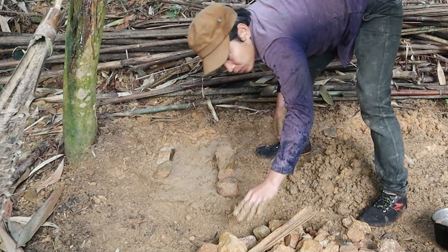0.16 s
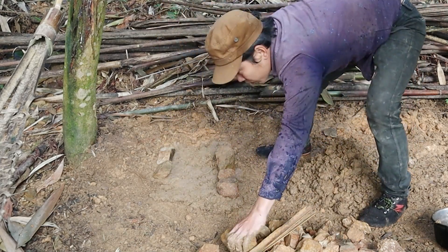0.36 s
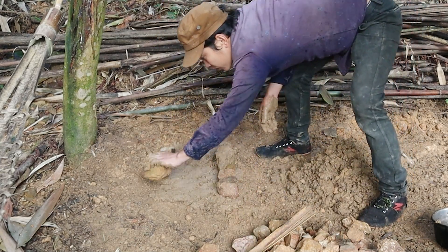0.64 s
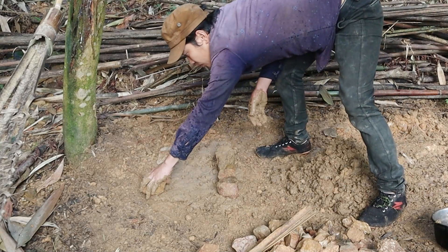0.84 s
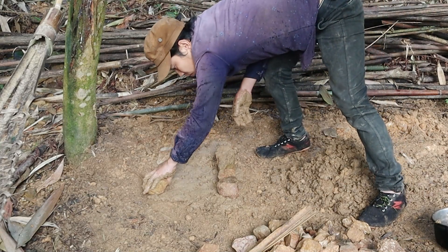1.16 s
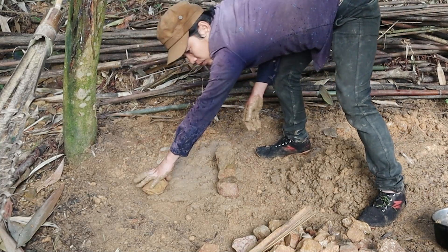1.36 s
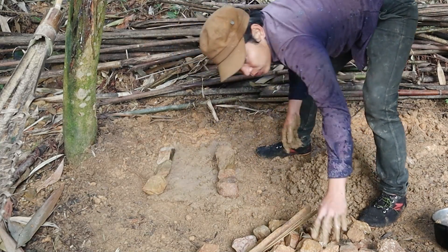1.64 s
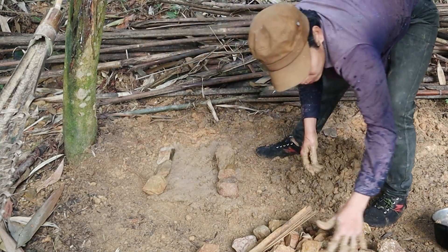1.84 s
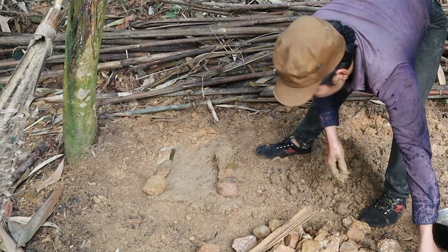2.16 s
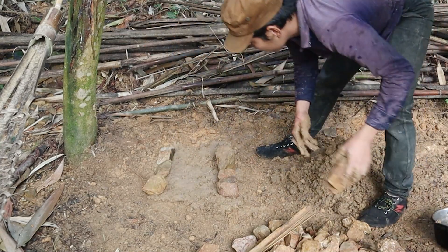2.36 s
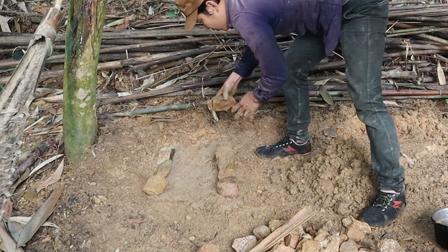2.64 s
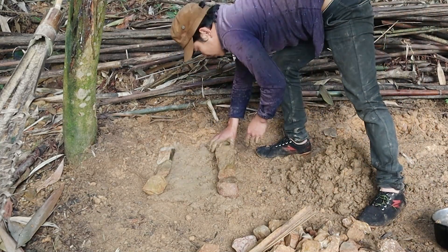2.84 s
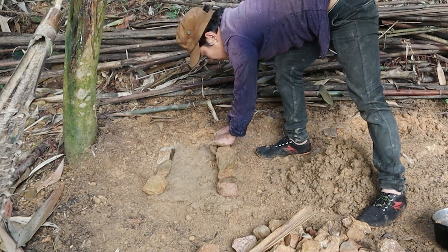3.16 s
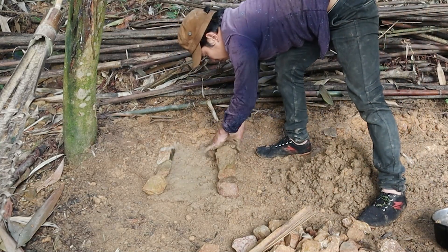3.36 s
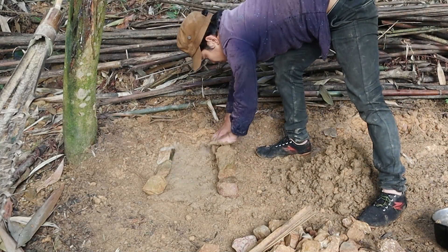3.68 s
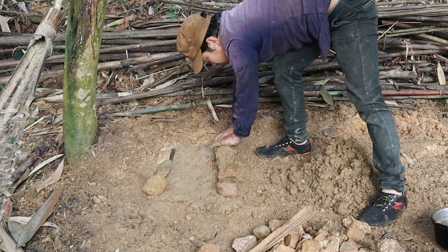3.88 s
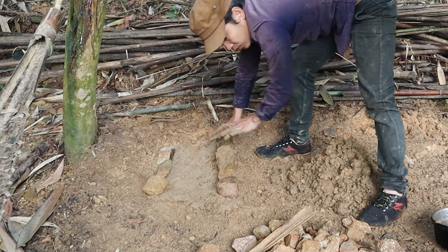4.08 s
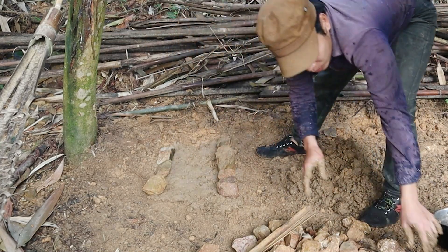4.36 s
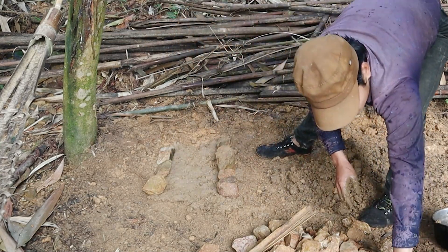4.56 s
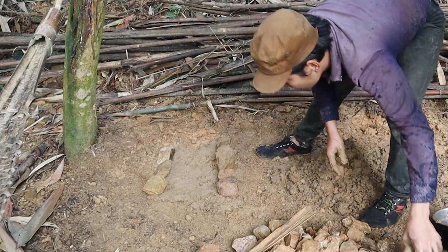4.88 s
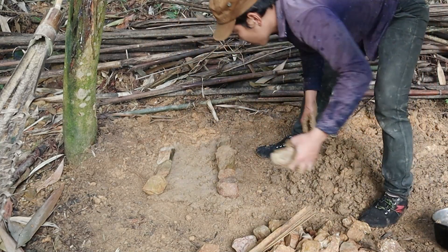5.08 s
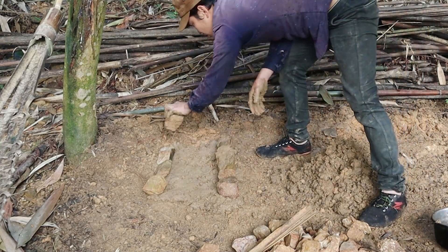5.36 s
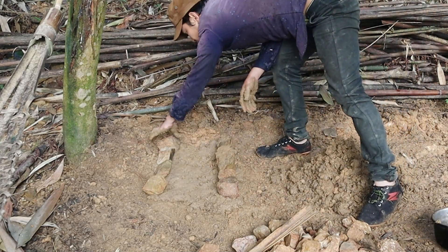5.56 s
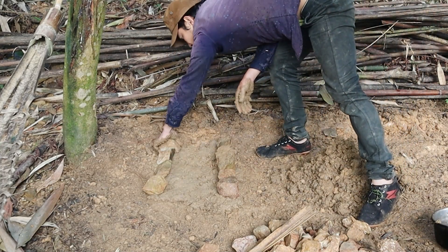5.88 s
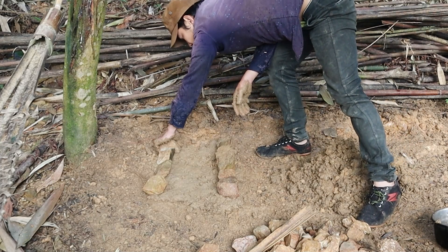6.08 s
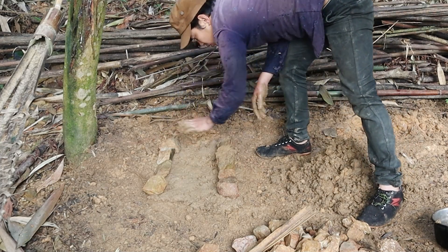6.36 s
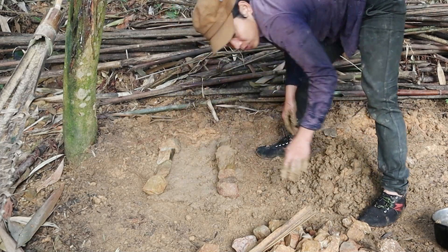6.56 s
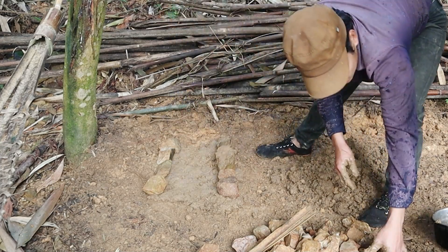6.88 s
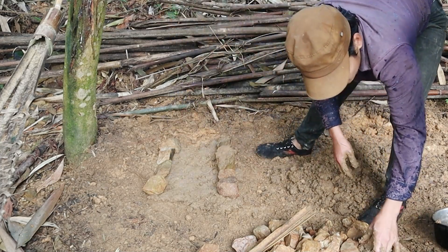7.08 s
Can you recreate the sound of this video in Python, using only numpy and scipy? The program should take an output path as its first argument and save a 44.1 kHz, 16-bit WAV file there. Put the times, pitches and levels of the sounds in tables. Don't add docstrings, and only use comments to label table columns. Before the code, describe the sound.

Stones clack and are pressed into loose, gritty soil, with dull thumps and crumbling earth, under a steady high insect drone in the woods.

```python
import sys
import numpy as np
from scipy import signal
from scipy.fft import rfft, irfft, next_fast_len
from scipy.io import wavfile

SR = 44100
rng = np.random.default_rng(int(sys.argv[2]) if len(sys.argv) > 2 else 0)


def decibels_to_gain(level_db):
    exponent = np.asarray(level_db, float) / 20
    return 10 ** exponent


def master(y):
    cut = np.clip(np.atleast_2d(y).T, -1, 1)
    pcm = np.round(cut * 32767)
    wavfile.write(sys.argv[1], SR, pcm.astype(np.int16))


N = 318402


def rms_one(x):
    return x / np.sqrt(np.mean(x ** 2) + 1e-20)


def highpass(x, hz):
    return signal.sosfilt(signal.butter(2, hz, "high", fs=SR, output="sos"), x)


def band(x, low_hz, high_hz, order=2):
    return signal.sosfilt(signal.butter(order, [low_hz, high_hz], "band", fs=SR, output="sos"), x)


def resonate(x, hz, width_hz):
    r = np.exp(-np.pi * width_hz / SR)
    feedback = [1, -2 * r * np.cos(2 * np.pi * hz / SR), r * r]
    return signal.lfilter([(1 - r * r) / 2, 0, (r * r - 1) / 2], feedback, x)


def coloured(spectrum):
    size = next_fast_len(N)
    hz, db = np.transpose(spectrum)
    bin_hz = np.arange(size // 2 + 1) * SR / size
    gain = decibels_to_gain(np.interp(np.log(bin_hz + 1), np.log(hz), db, left=-90, right=-90))
    return rms_one(irfft(rfft(rng.standard_normal(size)) * gain, size)[:N])


def drift(rate_hz):
    knots = rng.standard_normal(int(N / SR * 60) + 2)
    return np.interp(np.arange(N) / SR * rate_hz, np.arange(len(knots)), knots)


def grains(per_s, spread_db):
    sizes = decibels_to_gain(spread_db * np.minimum(rng.exponential(1, N), 5)) * rng.choice([-1, 1], N)
    return rms_one(sizes * (rng.random(N) < per_s / SR))


def add(out, s, sound):
    at = round(s * SR)
    out[at:at + len(sound)] += sound[:N - at]


def dying(t60, rise_s, size=4096):
    t = np.arange(size) / SR
    shape = (1 - np.exp(-t / rise_s)) * decibels_to_gain(-60 * t / t60)
    return shape / shape.max()


def pressing(contact_s, size=4096):
    t = np.arange(size) / SR
    return t, (t / contact_s) ** 2 * np.exp(2 - 2 * t / contact_s)


def crush(noise, hz, wide_db):
    wide = rms_one(band(noise, 560, 10000, order=1))
    stone = rms_one(resonate(resonate(noise, hz, 0.4 * hz), hz, 0.4 * hz))
    return rms_one(decibels_to_gain(wide_db) * wide + stone)


def bursts(rows, rise, roundness):
    power, t = np.zeros((3, N)), np.arange(N) / SR
    for s, db, coarse_db, dust_db, dies in rows:
        near = slice(round((s - dies * rise) * SR), round((s + dies) * SR))
        late = (t[near] - s) / dies
        fall_db = -60 * np.where(late > 0, late, -late / rise) ** roundness
        size_db = np.array([[coarse_db], [0], [dust_db]])
        power[:, near] += decibels_to_gain(db + fall_db + size_db) ** 2
    return power


def woods():
    # time in seconds, broad chorus, near singer and forest hiss in dB.
    insect_levels = [
        (0, -41, -41, -49.5),
        (.6, -40.5, -42.5, -50),
        (.8, -39.5, -47, -50),
        (1.1, -41, -52, -50.5),
        (1.4, -41, -43.5, -50),
        (3.0, -40.5, -41.5, -50.5),
        (4.4, -40.5, -43, -51),
        (5.4, -41, -43.5, -50),
        (6.2, -40.5, -41, -50),
        (7.22, -41.5, -43, -50),
    ]
    # frequency in Hz, density in dB per Hz.
    chorus_shape = [(9800, -57), (10400, -14.5), (10900, -4), (11400, 1), (11900, -3.5), (12500, 0),
                    (12800, -7), (13300, -24)]
    # frequency in Hz, density in dB per Hz.
    forest_shape = [(29, -48), (50, -7.5), (108, -3.5), (144, -3), (273, -1), (517, -4), (786, -5),
                    (859, -3), (1020, -6.5), (2640, -8.5), (3020, -8), (6380, -18.5), (9700, -41),
                    (12600, -32), (21300, -120)]
    # time in seconds, pitch in Hz.
    hum_pitch = [
        (0, 901),
        (3.5, 865),
        (7.22, 852),
    ]
    singer_hz, singer_width_hz, throb_hz = 12315, 70, 39.0

    s, *levels = np.transpose(insect_levels)
    t = np.arange(N) / SR
    chorus_db, singer_db, hiss_db = [np.interp(t, s, level) for level in levels]
    chorus = coloured(chorus_shape) * decibels_to_gain(chorus_db + 2.5 + 0.71 * drift(30))

    beat = 2 * np.pi * np.cumsum(throb_hz + .3 * drift(2.5)) / SR
    throb_db = 3.3 * np.cos(beat) + 2.6 * np.cos(3 * beat)
    singer = resonate(rng.standard_normal(N), singer_hz, singer_width_hz * 2.4)
    singer = rms_one(resonate(singer, singer_hz, singer_width_hz * 3.6)) * decibels_to_gain(singer_db + throb_db)

    top_hiss = decibels_to_gain(-54.5 + 2.5) * rms_one(band(rng.standard_normal(N), 10500, 19845, order=4))
    hum_hz = np.interp(t, *np.transpose(hum_pitch)) + 4.1 * drift(16)
    hum = decibels_to_gain(-65.5 + 1.0 * drift(4.3)) * np.sin(2 * np.pi * np.cumsum(hum_hz) / SR)
    hiss = decibels_to_gain(hiss_db - 2.0 + 0.29 * drift(27.0)) * coloured(forest_shape)
    return chorus + singer + top_hiss + hum + hiss


def soil():
    # peak in seconds, level in dB, coarse grains and dust in dB re level,
    # dying time in seconds. Soil crumbles under a set-down stone:
    crumbles = [(.7515, -38, 1, -6, 0.052), (.7595, -33, 7, -9, 0.069), (.764, -24, -7, -10, 0.041),
                (.778, -34, -1, 1, 0.2), (.803, -32, -8, -3, 0.098), (.812, -46, -6, 0, .2),
                (2.897, -45, 0, 0, 0.14), (2.9135, -29, 1.5, 1, 0.19), (2.945, -48, 0, -4, 0.23),
                (3.34, -42, 7, -13, 0.12), (3.36, -52, 10, -10, 0.36), (3.7205, -48, 12, -5, 0.045),
                (3.7272, -19, 2, -8, 0.037), (3.74, -37.5, -5, -2, 0.25), (5.5165, -30, -3, -8, .015),
                (5.525, -28.5, 2.5, 2, 0.18), (5.55, -39, 0, -12, 0.2), (5.929, -48, 4, -10, .03),
                (5.9405, -35, 2, 7, .08), (5.955, -37, -2.5, -8, 0.21)]
    slides = [(.348, -56, 8, 14, 0.033), (.368, -45, -5, 4, .05), (.388, -49, 5, -3, 0.077),
              (.49, -63, 13, -1, 0.11), (1.82, -52, 0, 6, 0.046), (1.88, -53.5, 7.5, -4, 0.08),
              (2.207, -35, -25, 2, 0.05), (2.225, -35, -16, 4.5, 0.074), (2.245, -36, -16, 0, .07),
              (2.26, -42, -20, -2, 0.09), (4.665, -45, -4, 0, 0.07), (4.687, -33, -10, 2, 0.037),
              (4.70, -34, -16, 5, 0.055), (4.725, -38, -2, 0, 0.15), (4.771, -36, -15, 6, .02),
              (4.784, -40, -2.5, 2, 0.069), (4.835, -48.5, -2, 5, 0.19), (7.012, -47, -2, 1, 0.12),
              (7.048, -46, 6, -5, 0.11), (7.072, -43, 7, 8, 0.057), (7.1, -45.5, 5.5, -2, 0.11),
              (7.135, -40, 1.5, 3, 0.021), (7.157, -45, 2, 0, 0.13)]
    brushes = [(.978, -47, -9, 2, .1), (1.06, -45.5, -5, 2, 0.091), (1.1, -49.5, -11, -3, .15),
               (2.08, -57, 0, 15, .08), (2.612, -55, 2, 15, .05), (3.17, -52, -10, 10, .07),
               (3.193, -37.5, -25, -5, 0.12), (3.236, -44, -11, -1, .09), (3.51, -50, -14, 6, .12),
               (3.545, -44.5, -13, 7, 0.077), (3.925, -45, -8, 3, 0.17), (4.05, -60, -10, 17, .05),
               (4.29, -56, 3, -11, 0.099), (4.91, -52, -5, -1, 0.14), (5.78, -53, -19, 8, .1),
               (6.105, -49, 0, -9, 0.11), (1.24, -54, -5, -5, .1), (1.435, -60, 9, -5, .08),
               (6.7, -56, 2, -8, .1)]
    # levels of coarse, fine and dust grains in dB.
    trickle_levels = (-64, -57, -55)
    crumb_share, clump_db = .6, 1.0
    bounce_s, bounce_share = .00023, .3
    dip_hz, dip_width_hz, dip_share = 7430, 3200, 0.12

    crumbs = crumb_share * grains(1200, 3.)
    # clicks, low Hz, high Hz, lift dB
    sizes = [(grains(5000, 2.5), 700, 3800, .1),
             (grains(9000, 2.5), 4600, 9900, .8),
             (grains(12000, 2.), 11500, 16200, 2.5)]
    sliding = bursts(slides, rise=1, roundness=1.32)
    power = bursts(crumbles, rise=0.54, roundness=0.65) + sliding + bursts(brushes, rise=0.95, roundness=0.91)

    out, clumps = np.zeros(N), drift(55)
    for (clicks, low, high, lift_db), moving, trickle_db in zip(sizes, power, trickle_levels):
        stirred = rms_one(band(clicks + crumbs, low, high, order=3)) * np.sqrt(moving)
        trickle = rms_one(band(clicks[::-1], low, high, order=3)) * decibels_to_gain(trickle_db)
        out += decibels_to_gain(lift_db + clump_db * clumps) * (stirred + trickle)

    share = bounce_share * sliding[1] / (power[1] + decibels_to_gain(trickle_levels[1]) ** 2)
    samples = np.arange(N)
    out = out + share * np.interp(samples - bounce_s * SR, samples, out)
    return out - dip_share * resonate(out, dip_hz, dip_width_hz)


def cricket():
    # start in seconds, peak in dB, pitch in Hz, length in seconds.
    chirps = [(.05, -50, 2350, .02), (.2349, -44.5, 3040, .025), (.609, -50, 3100, .023),
              (1.51, -51, 2850, .022), (2.365, -51, 2880, .02), (2.41, -53, 2900, .018),
              (2.83, -52, 2800, .02), (3.3535, -35, 2950, .017), (4.28, -52, 2400, .025),
              (4.455, -51, 3100, .02), (4.47, -51, 1850, .025), (4.51, -49, 3000, .023),
              (6.03, -51, 2950, .015), (6.3, -52, 4500, .015), (6.56, -51, 3100, .02),
              (6.691, -50, 3050, .021)]
    out = np.zeros(N)
    for s, db, hz, length in chirps:
        t = np.arange(round(length * SR)) / SR
        swell = np.sin(np.pi * t / length) ** 0.42
        pulses = 0.83 + 0.45 * np.cos(2 * np.pi * 130 * t)
        blur = np.cumsum(rng.normal(0, .07, len(t)))
        add(out, s, decibels_to_gain(db) * swell * pulses * np.sin(2 * np.pi * hz * t + blur))
    return out


def ticks():
    # start in seconds, peak in dB,
    # grit colour in Hz.
    pebble_ticks = [(0.349, -30, 5300), (0.349, -31, 2200), (0.3653, -27, 1310), (0.474, -24, 2200),
                    (0.5, -31, 1300), (1.8514, -35, 4870), (1.8724, -29, 2840), (1.895, -25.5, 2750),
                    (2.2083, -19.5, 7800), (2.2695, -24, 5400), (4.6544, -33, 4500), (4.668, -25, 8700),
                    (4.678, -20, 8700), (4.6856, -15.5, 3900), (4.704, -20, 8700), (4.711, -20, 8600),
                    (6.9983, -34, 2200), (7.015, -32, 3500), (7.0274, -21, 4000), (7.0498, -28, 2900),
                    (7.0566, -26, 2100), (7.0897, -27, 2000), (7.0957, -27, 3060), (7.1235, -29, 2070),
                    (7.1346, -22, 5600), (7.147, -28, 5000), (7.15, -27, 3800), (7.1563, -28, 3600),
                    (4.68, -26, 2600), (4.7, -19, 3500), (4.731, -30, 2000), (4.7738, -23, 4900),
                    (4.876, -35, 5500), (0.375, -31, 1500), (0.374, -30, 6200), (2.2245, -23, 5300),
                    (2.2422, -23, 9500), (2.2534, -24, 5000), (1.1876, -36, 3500), (1.245, -36, 5500),
                    (1.666, -35, 9000), (4.7077, -23, 3500), (4.719, -24, 4500), (4.821, -33.5, 2620),
                    (4.834, -30, 5220), (4.9075, -22.5, 4540), (4.9317, -31, 4570), (4.993, -37.5, 5970),
                    (7.006, -22, 3350), (7.12, -22, 3350), (7.1315, -27, 1400), (7.136, -28, 1300),
                    (7.1536, -31, 1160),
                    (0.7716, -33, 2500), (0.7981, -21, 9500), (0.802, -21, 7000), (0.9807, -33.5, 5400),
                 (1.0725, -33, 6060), (3.1654, -28, 5200), (3.173, -25, 5270), (3.24, -32.5, 3070),
                 (3.317, -24.5, 3260), (3.318, -22, 6640), (3.7122, -21, 5400), (3.7165, -22, 1300),
                 (3.7195, -19, 900), (3.4994, -33.5, 5660), (3.541, -28.5, 9490), (3.906, -35, 8710),
                 (3.931, -30, 5130), (4.276, -34, 2370), (4.47, -38, 1870), (5.7705, -29, 4960),
                 (5.891, -32.5, 2980), (5.9298, -24, 1700), (5.934, -21.5, 1800), (6.0951, -31, 1210),
                 (6.097, -35, 3000), (6.11, -36, 5200), (6.24, -40, 4000), (6.3625, -35, 7000),
                 (6.363, -33, 14800), (3.1866, -27, 5200), (1.056, -37, 2500), (1.097, -37, 5500)]
    out = np.zeros(N)
    for s, db, hz in pebble_ticks:
        grit = crush(rng.standard_normal(4096), hz, wide_db=-7.)
        add(out, s, decibels_to_gain(db - 7) * grit * dying(t60=0.015, rise_s=0.0002))
    return out


def knocks():
    # start in seconds, peak in dB, stone ring in Hz, contact time in seconds,
    # crushed grit in dB re peak. A stone is set down against its neighbours, edge after edge:
    set_downs = [(0.7535, -8, 1500, 0.0004, -8), (0.7538, -14, 3200, 0.0003, -4),
                 (0.7547, 1.5, 1180, 0.0006, -35), (0.7548, -11, 3700, 0.0005, -6),
                 (.7811, -17, 2190, 0.00015, -17), (2.9017, -10, 3100, 0.00025, -8),
                 (2.9052, -6, 5300, 0.0004, -12), (2.9069, -12.5, 3900, 0.00031, 2),
                 (2.9074, -3.5, 1550, 0.0004, -8), (2.9102, -13, 1300, 0.0006, -8),
                 (2.9053, -14, 3600, 0.0004, -10), (2.908, -3.5, 2900, 0.00046, -25),
                 (2.9076, -10, 750, 0.0008, -6), (3.1911, -12, 5700, 0.00027, -20),
                 (3.3357, -7.5, 1150, 0.0005, -18), (3.3363, -11, 2800, 0.0005, -30),
                 (3.3369, -15, 950, 0.0009, -20), (3.7121, -5.5, 920, 0.0008, -26),
                 (3.71198, -10, 1680, 0.0009, -31), (3.7258, -22, 3600, 0.0004, -3),
                 (3.725, -20, 1070, 0.0004, 0.5), (0.7548, -15.5, 5000, 0.00025, -2),
                 (2.9033, -14, 6300, 0.00018, -6), (2.9085, -13, 7400, 0.0005, -8),
                 (3.3356, -23, 5700, 0.00047, -5), (5.9307, -18.5, 5500, 0.00027, -1.5),
                 (5.9341, -16, 5300, 0.00059, -2), (5.9343, -15, 2980, 0.0008, -8),
                 (5.9339, -15, 537, 0.00048, -4)]
    pile_clacks = [(4.6855, -6.5, 8900, 0.0003, -15), (4.6912, -12, 8500, 0.0004, -8),
                   (4.6925, -20, 3970, 0.00035, 1), (4.6938, -19, 9000, 0.0004, -3),
                   (4.6969, -15, 9300, 0.00036, -7), (4.6936, -16, 14200, 0.0004, -6),
                   (4.697, -11, 13800, 0.0004, -10), (4.765, -18, 13800, 0.0005, -3),
                   (4.7697, -19, 13300, 0.0005, -3), (4.7697, -22, 8900, 0.0004, -6),
                   (4.7649, -17, 1700, 0.0003, -6), (4.7695, -21, 1900, 0.00035, -4),
                   (7.0305, -11, 2150, 0.0003, -20), (7.0342, -21, 1750, 0.0003, -12),
                   (7.0619, -16, 3270, 0.0003, -9), (7.0659, -16, 3300, 0.0003, -9),
                   (7.0678, -18, 1900, 0.0005, -6), (7.0635, -20, 1900, 0.0005, -4),
                   (7.0785, -20, 2000, 0.0005, -4), (7.0704, -20, 3300, 0.0004, -3),
                   (7.0735, -22, 3450, 0.0004, -3), (7.0776, -18, 3400, 0.0003, -6),
                   (7.0527, -25, 1850, 0.0003, -4)]
    drop_cracks = [
        (5.5171, -4, 2100, 0.00027, -9),
        (5.5177, -3, 3000, .00025, -12),
        (5.5182, -7, 2100, 0.00028, -3),
        (5.5183, -2, 6000, 0.00039, -8),
        (5.5191, -1.5, 3600, 0.0001, -8),
        (5.5194, -1.5, 920, 0.0005, -15),
        (5.5197, 0.5, 8200, 0.00017, -10),
        (5.5199, -5, 2650, 0.00027, -12),
        (5.5176, -5, 8000, .0003, -10),
        (5.5178, -8, 1300, .0005, -15),
    ]
    hits = [(*row, 0.014) for row in set_downs + drop_cracks]
    hits += [(*row, 0.011) for row in pile_clacks]
    out = np.zeros(N)
    for s, db, hz, contact_s, grit_db, grit_t60 in hits:
        noise = rng.standard_normal(4096)
        t, press = pressing(contact_s)
        ring = -np.sin(2 * np.pi * hz * t) - decibels_to_gain(-9.5) * np.sin(2 * np.pi * 1.394 * hz * t)
        crackle = crush(noise, hz, wide_db=-6.0) * dying(grit_t60, 0.00006)
        snap = decibels_to_gain(-21.0) * band(noise, 1600, 10000, order=1) * press
        grit = decibels_to_gain(grit_db) * (crackle + decibels_to_gain(-4.0) * snap)
        add(out, s, decibels_to_gain(db + 0.5) * (ring * press + grit))
    return highpass(out, 450)


def thumps():
    # start in seconds, peak in dB, push in Hz,
    # rumble in dB re peak, rumble t60 in seconds.
    ground_blows = [
        (0.7565, -18.5, 348, -13, 0.13),
        (0.766, -32, 130, -16, 0.06),
        (2.906, -13, 386, -23, 0.1),
        (3.3370, -30.5, 440, -15.5, 0.19),
        (3.715, -26.5, 320, -12, 0.095),
        (3.7260, -20.5, 430, -14.5, 0.11),
        (5.5212, -3, 300, -16.5, 0.068),
        (5.54, -43, 160, 2.5, 0.37),
        (5.9362, -17.5, 270, -19, 0.15),
    ]
    size = 16384
    out = np.zeros(N)
    t, push = pressing(.0017, size)
    for s, db, hz, rumble_db, t60 in ground_blows:
        noise = rng.standard_normal(size)
        rumble = decibels_to_gain(rumble_db) * rms_one(band(noise, 104, 340)) * dying(t60, 0.0011, size)
        hollow = decibels_to_gain(-36) * rms_one(resonate(noise[::-1], 165, 30)) * dying(.33, .01, size)
        add(out, s, decibels_to_gain(db) * (np.sin(2 * np.pi * hz * t) * push + hollow + rumble))
    return out


def scattered(hard):
    scatter = rng.standard_normal(8192) * dying(t60=0.17, rise_s=0.0046, size=8192)
    scatter /= np.linalg.norm(scatter)
    return decibels_to_gain(-22) * signal.fftconvolve(band(hard, 300, 7000, order=1), scatter)[:N]


def scene():
    background = woods() + soil() + cricket()
    hard = ticks() + knocks()
    return np.tile(background + hard + scattered(hard) + thumps(), (2, 1))


def band_limit(x):
    return signal.sosfilt(signal.butter(12, 16320, fs=SR, output="sos"), x)


def record(dry):
    cut = highpass(dry, 70)
    cut = signal.sosfilt(signal.ellip(10, .5, 70, 15750, fs=SR, output="sos"), cut)
    smear = rng.standard_normal(256)
    side = band(np.convolve(cut[0], smear / np.linalg.norm(smear))[:N], 300, 9600)
    side = .003 * np.tanh(decibels_to_gain(-28) * side / .003)
    overloaded = np.clip(cut + .002, -1, 1)
    return band_limit(overloaded + side * [[1], [-1]])


dry = scene()
out = record(dry)
master(out)
```